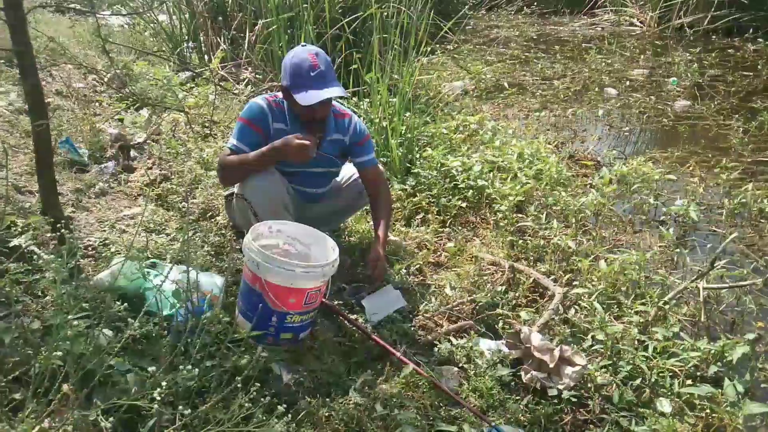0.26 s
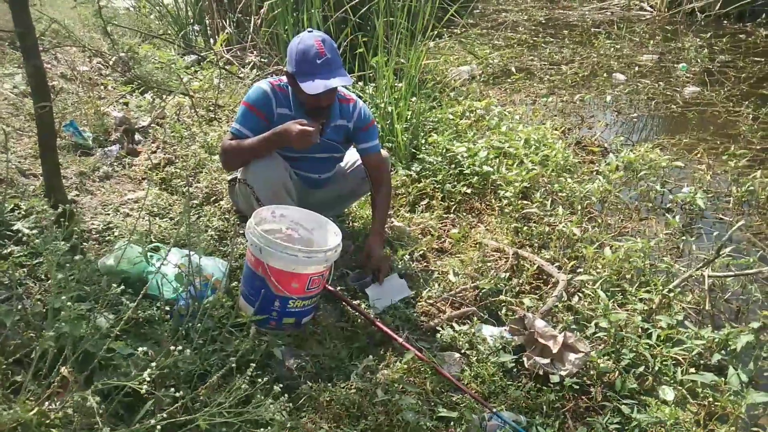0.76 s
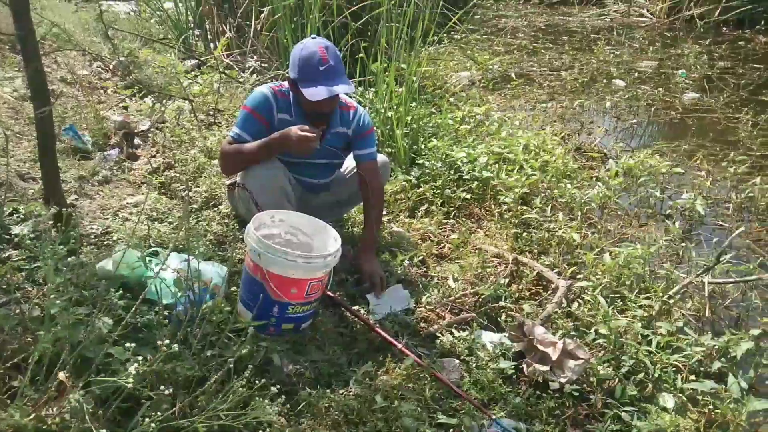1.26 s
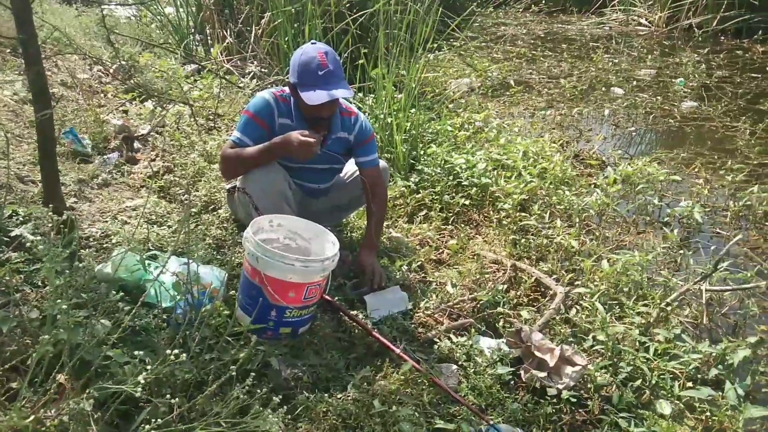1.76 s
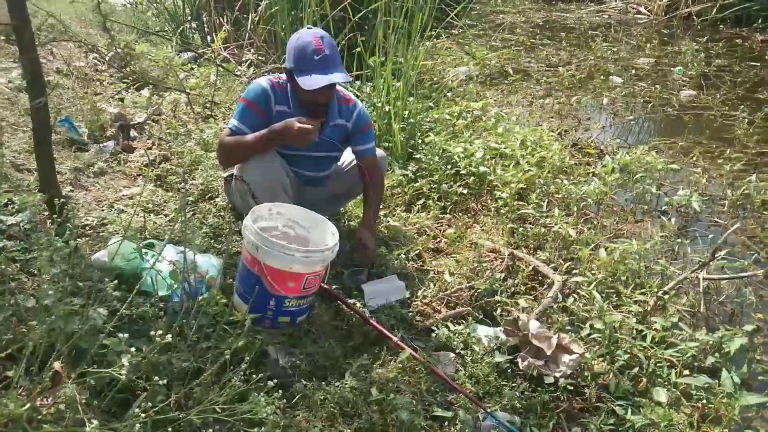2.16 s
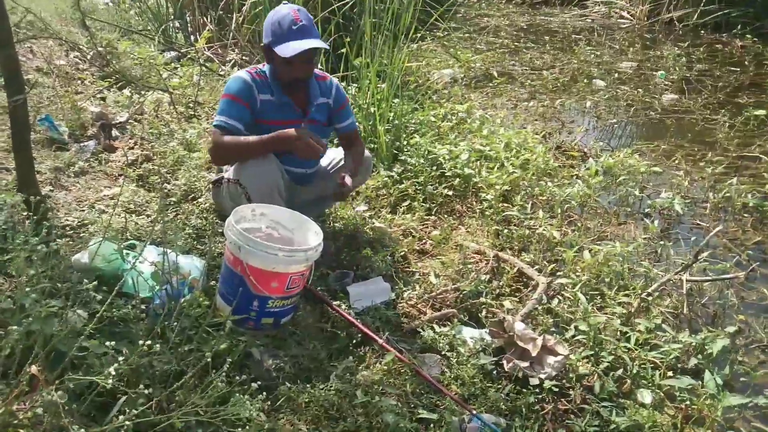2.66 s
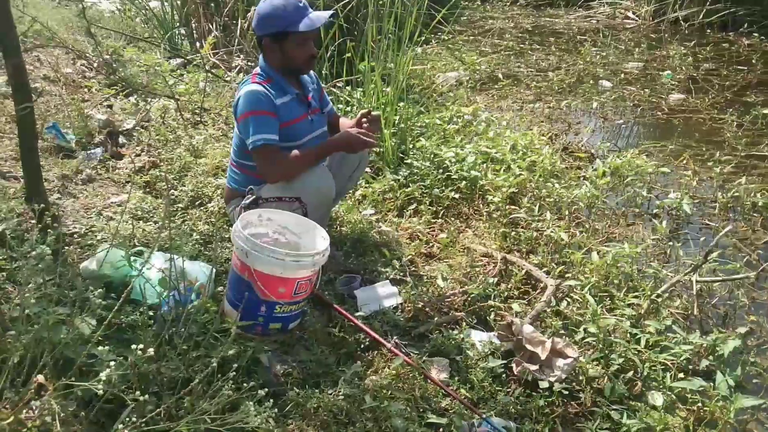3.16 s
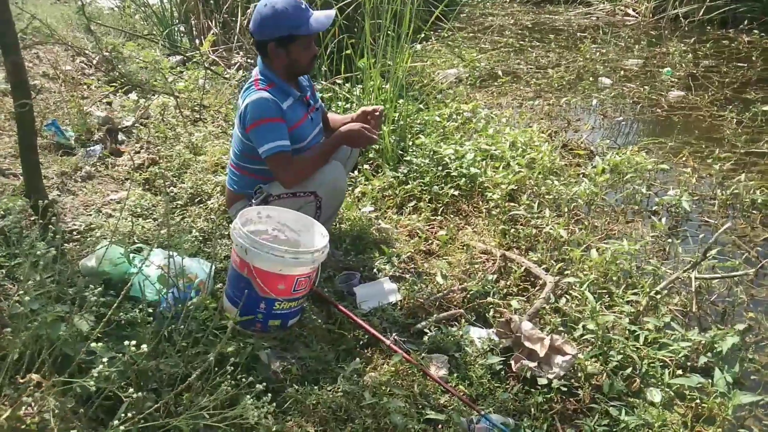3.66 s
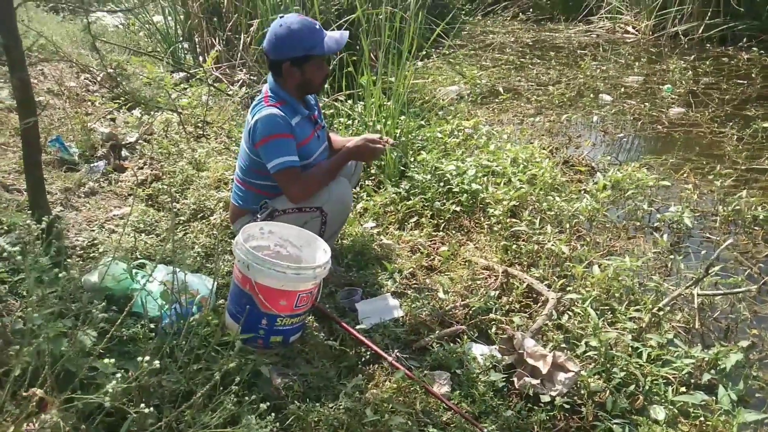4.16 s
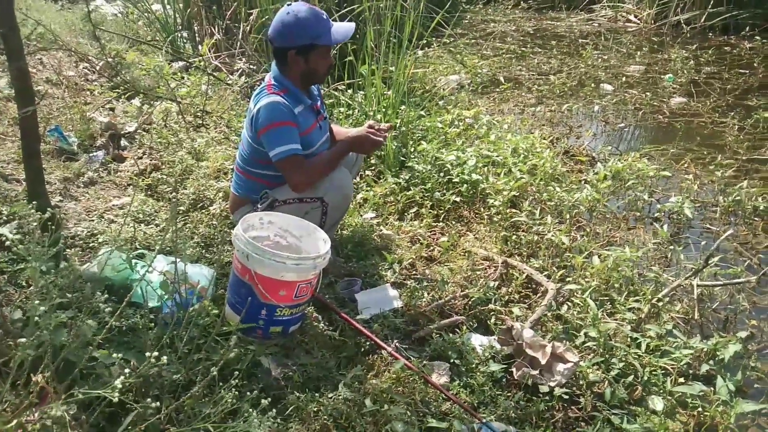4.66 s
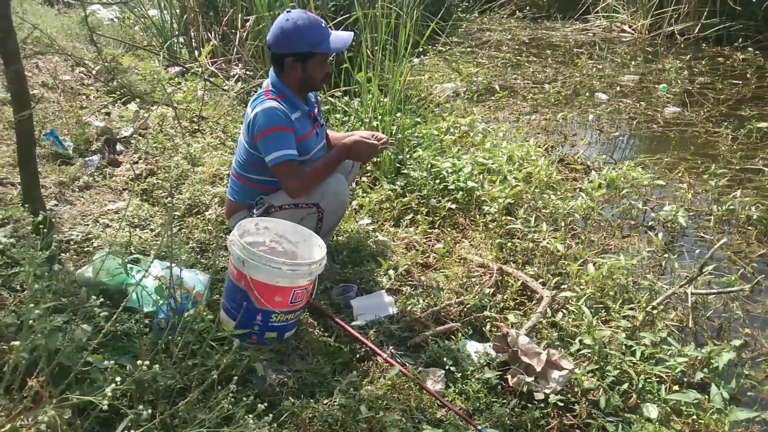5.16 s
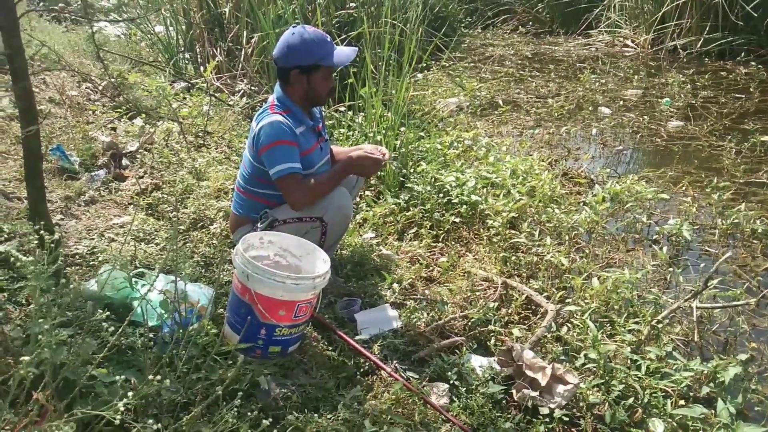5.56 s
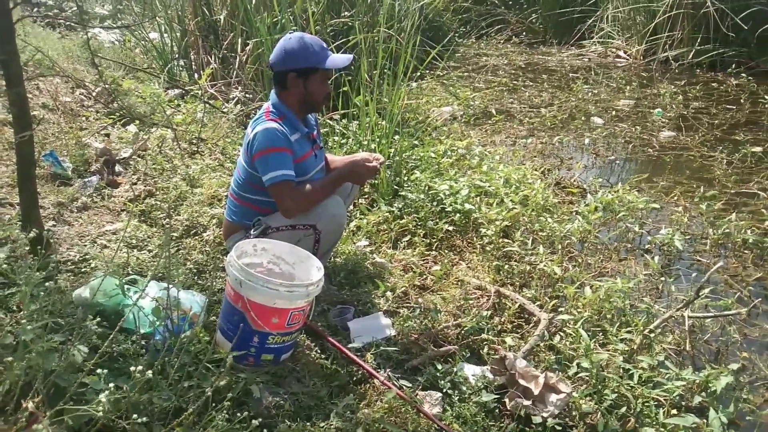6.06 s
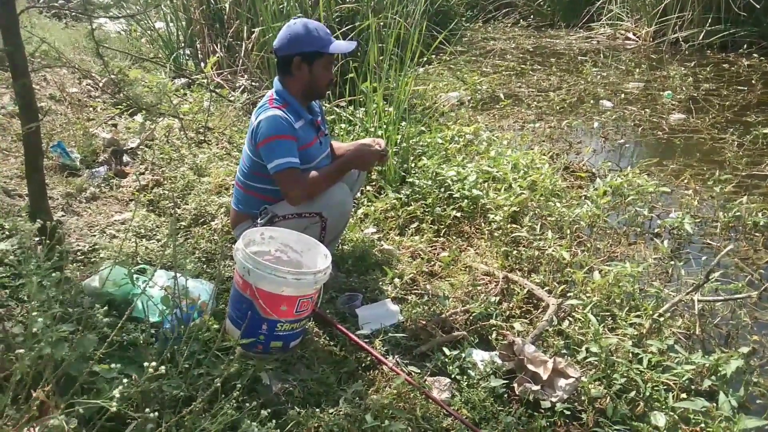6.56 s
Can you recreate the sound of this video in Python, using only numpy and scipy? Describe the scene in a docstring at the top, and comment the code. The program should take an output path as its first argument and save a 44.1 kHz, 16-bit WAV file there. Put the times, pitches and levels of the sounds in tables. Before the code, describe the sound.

Close handling ticks and hollow thuds at a quiet pond edge, a brief run of bird chips and buzzes, faint crickets chirping throughout.

```python
"""Weedy pond edge, hand on the microphone

Two crickets, sines wavering in pitch, chirp over a thin chorus of narrow-band noise. Whistles gliding in pitch
make two small birds nearby: chips that slow into a trill, then buzzes, with an echo from bank and reeds.
A hand shifts on the microphone's case: noise bursts drive its resonances as ticks, scrapes and rustle, and
pushes ring hollow thuds. Low noise rumbles on the port as wind, swelling in gusts and when the hand bumps the
case, over steady far leaves and hiss.
"""
import sys
import numpy as np
from scipy import signal
from scipy.fft import rfft, irfft
from scipy.io import wavfile
from scipy.ndimage import uniform_filter1d

SR = 44100
rng = np.random.default_rng(int(sys.argv[2]) if len(sys.argv) > 2 else 0)


def boost(x):
    """Linear amplitude factor 10**(x/20) for a level x in decibels (scalar or array-like)."""
    u = np.asarray(x, float) / 20
    return 10 ** u


def dump(signal):
    """Clip the signal to [-1, 1] and save it as 16-bit WAV at the path in sys.argv[1]."""
    limited = np.clip(np.atleast_2d(signal).T, -1, 1)
    pcm = np.round(limited * 32767).astype(np.int16)
    wavfile.write(sys.argv[1], SR, pcm)


N = 301070
T = np.arange(N) / SR

# steady rubbing of the resting hand: time_s, middle_drive_db, top_drive_db
RUB = [(0.0, -70, -95), (0.5, -70, -93.5), (0.7, -68.5, -80.5), (1.4, -64, -75), (1.7, -57, -70),
       (1.85, -68, -81.5), (3.2, -69.5, -82.5), (3.45, -89, -87.5), (4.05, -71, -85), (4.33, -65, -78),
       (4.5, -73.5, -90.5), (5.6, -72, -86.5), (6.83, -73, -83)]


def level(x, db):
    """Scale to an rms level in dB."""
    return x * boost(db) / np.sqrt(np.mean(x ** 2))


def curves(table):
    """Columns of a table after its times, drawn as lines with one value a sample."""
    s, *columns = np.transpose(table)
    return [np.interp(T, s, c) for c in columns]


def band(x, lo_hz, hi_hz, order=2):
    """Band-pass."""
    return signal.sosfilt(signal.butter(order, [lo_hz, hi_hz], "band", fs=SR, output="sos"), x)


def response(table):
    """Causal (minimum-phase) impulse response that follows (Hz, dB) points."""
    size = 16384
    hz, db = np.transpose(table)
    bins_hz = np.arange(size // 2 + 1) * SR / size
    gain = boost(np.interp(np.log(bins_hz + 1), np.log(hz), db))
    # fold the cepstrum forward so that nothing sounds ahead of its cause
    cepstrum = irfft(np.log(gain))
    cepstrum[1:size // 2] *= 2
    cepstrum[size // 2 + 1:] = 0
    return irfft(np.exp(rfft(cepstrum)))[:size // 2]


def colour(x, table):
    """Filter by (Hz, dB) points."""
    return signal.oaconvolve(x, response(table))[:N]


def walk(rate):
    """Random levels held 1 / rate s and smoothed twice; spread near 1."""
    k = int(SR / rate)
    held = np.repeat(rng.standard_normal(N // k + 1), k)
    return 1.6 * uniform_filter1d(uniform_filter1d(held, k), k)[:N]


def swells(steady_db, events):
    """Gains of a steady level plus swells that rise and fall evenly in dB round their peak."""
    power = boost(np.array(steady_db)) ** 2
    for s, *peak_db, fall_s in events:
        swell_db = np.array(peak_db)[:, None] - 10 * np.abs(T - s) / fall_s
        power = power + boost(swell_db) ** 2
    return np.sqrt(power)


def beat(table):
    """Place within each repeat (-.5 to .5, 0 in its middle) and repeats per second."""
    turns, = curves(table)
    return (turns + .5) % 1 - .5, np.gradient(turns) * SR


def wing(hz, waver_hz):
    """A ringing wing: a sine whose pitch wavers quickly."""
    return np.sin(2 * np.pi * np.cumsum(hz + waver_hz * walk(90)) / SR)


def crickets():
    """Five wing strokes a chirp up high; pairs of longer notes below; a blur of far ones as narrow noise."""
    # tempo of the high cricket, drifting a little: time_s, chirps_so_far
    high_chirps = [(-.29, 0), (.516, 8), (2.099, 24), (2.514, 28), (4.089, 44), (5.312, 56), (6.89, 72)]
    # tempo of the low cricket: time_s, note_pairs_so_far (a whole count is the middle of a pair)
    low_pairs = [(-.24, 0), (.478, 4), (1.227, 8), (1.632, 10), (3.1, 18), (5.774, 32), (6.135, 34),
                 (7.13, 40)]
    # how strongly each is heard: time_s, high_gain_db, low_gain_db, chorus_gain_db
    insects = [(0.0, -84, -72, -81), (0.61, -83.5, -77, -71), (1.63, -79, -68.5, -62.5),
               (2.15, -74.5, -79, -71), (2.53, -73.5, -70.5, -70), (2.91, -78.5, -76, -66.5),
               (3.36, -79, -77, -69), (3.84, -76.5, -73, -70), (5.15, -77, -67.5, -66.5),
               (5.89, -72, -68.5, -60.5), (6.29, -72.5, -72, -62), (6.83, -78.5, -64, -64.5)]
    high_db, low_db, chorus_db = curves(insects)

    place, rate = beat(high_chirps)
    stroke = place / rate * 120 + 2.0  # 120 strokes a second
    strokes = (.2 + .8 * np.sin(np.pi * stroke) ** 2) * (stroke > 0) * (stroke < 5)
    high = strokes * boost(2.133 * walk(60)) * wing(7530 + 18 * stroke, 40.124)

    place, rate = beat(low_pairs)
    from_note_s = np.abs(place / rate) - .023  # the notes stand 23 ms either side of the middle
    notes = np.exp(-(from_note_s / 0.018406) ** 2)
    low = notes * boost(3 * walk(25)) * wing(6970, 28)

    chorus = boost(1.747 * walk(8.3)) * band(rng.standard_normal(N), 6769.5, 7102.2)
    near = level(high, 4.401) * boost(high_db) + level(low, 0.7854) * boost(low_db)
    return near + level(chorus, -3) * boost(chorus_db)


def wind():
    """Low eddies of coloured noise on the port; a higher buffet swells in gusts and when the hand bumps the case."""
    # steady wind on the port: time_s, level_db
    steady_wind = [(0.0, -47), (0.36, -45), (0.46, -61), (1.2, -58.5), (1.9, -61.5), (2.15, -64.5),
                   (2.55, -58.5), (3.5, -67.5), (4.0, -68.5), (5.2, -66.5), (5.9, -59), (6.05, -64),
                   (6.37, -59.5), (6.73, -66.5), (6.83, -63.5)]
    # gusts, and bumps of the hand on the case: peak_s, eddies_db, buffet_db, time to fall by 10 dB fall_s
    gusts_and_bumps = [(0.0, -33.5, -52.5, 0.0448), (0.11, -37.5, -60, 0.0625), (0.23, -29, -44, 0.0231),
                       (0.33, -43, -53, 0.0433), (0.57, -43, -55.5, 0.0335), (0.81, -34.5, -57, 0.0405),
                       (1.28, -65.5, -55, 0.0752), (1.37, -47, -61.5, 0.0249), (1.98, -53.5, -57, 0.047),
                       (2.17, -57.5, -61, 0.0829), (4.1, -56.5, -56, 0.03), (4.2, -63, -62.5, 0.0439),
                       (4.47, -62, -66.5, 0.1209), (5.0, -50, -56, 0.0239), (5.05, -54, -76, 0.0248),
                       (5.4, -62.5, -59, 0.0138)]
    # spectrum of the eddies: frequency_hz, density_db (per Hz)
    eddy_colour = [(12, -58.5), (20, -39), (32, -5), (63, -2), (81, 0.5), (98, 0), (134, -8), (160, -12.5),
                   (210, -35.5), (350, -120)]
    buffet_db = -10.5  # against the steady wind
    wind_db, = curves(steady_wind)
    low, high = swells([wind_db, wind_db + buffet_db], gusts_and_bumps)
    eddies = level(colour(rng.standard_normal(N), eddy_colour), 0) * boost(1.8 * walk(25))
    buffet = level(band(rng.standard_normal(N), 119.89, 295.84), 0) * boost(2.0 * walk(30))
    return low * eddies + high * buffet


def case(table, low, middle, top):
    """Three drives into the low, middle and bright parts of the case's response, with its resonances."""
    # resonances of the case: frequency_hz, width_hz, gain_db
    case_modes = [(958.68, 54.53, 2.5), (1705.9, 70.8, -5.5), (2110.2, 71.13, -5), (2543.4, 172.7, 0.5),
                  (2956.6, 187.3, -5), (3671.3, 45, -12.5), (6348.3, 600, -13.5)]
    unit = response(table)[:SR // 20]
    rings = sum(boost(db) * signal.lfilter(*signal.iirpeak(hz, hz / width, SR), unit)
                for hz, width, db in case_modes)
    unit = unit + rings
    parts = [band(unit, lo, hi, order=3) for lo, hi in ((330, 1500), (1500, 4300), (4300, 17000))]
    # the top part is scaled by its 8-15 kHz strength alone
    sizes = parts[:2] + [band(unit, 8000, 15000, order=3)]
    drives = low, middle, top
    return sum(signal.oaconvolve(x, h / np.linalg.norm(size))[:N] for x, h, size in zip(drives, parts, sizes))


def rustle():
    """Dense tiny slips of very uneven size, in flurries; the treble crackles more unevenly still."""
    # rub strokes: peak_s, middle_drive_db, top_drive_db, time to fall by 10 dB fall_s
    rub_strokes = [(0.12, -56, -82, 0.0597), (0.31, -60.5, -85.5, 0.0013), (0.86, -59, -75.5, 0.2227),
                   (1.25, -53, -67.5, 0.1146), (1.519, -46, -65, 0.0567), (1.77, -46.5, -61, 0.033),
                   (1.86, -59.5, -70.5, 0.055), (1.981, -46.5, -60, 0.0256), (2.18, -64.5, -69.5, 0.06),
                   (2.23, -50, -85, 0.0276), (2.45, -52.5, -72, 0.0374), (2.65, -53, -75, 0.0422),
                   (3.07, -59.5, -78.5, 0.1057), (4.44, -50.5, -64, 0.0242), (5.05, -68.5, -92, 0.0249),
                   (5.7, -65, -68.5, 0.0251), (5.77, -58.5, -65.5, 0.0539), (5.84, -58.5, -69, 0.0752),
                   (5.99, -59, -79, 0.0461), (6.19, -59.5, -72, 0.0417), (6.59, -63, -70.5, 0.0182),
                   (6.72, -69, -71.5, 0.0281)]
    # spectrum of the rubbed case: frequency_hz, density_db (per Hz)
    rubbed = [(240, -38), (400, -16.5), (579, -10), (666, -4.5), (935, -7.5), (1490, -7), (2840, 4),
              (4380, -7), (7170, -0.5), (10500, -27.5), (14800, -19), (16000, -16.5)]
    middle, top = swells(curves(RUB), rub_strokes)
    size_db = np.minimum(5.5 * rng.exponential(size=N), 27)
    slips = level(rng.standard_normal(N) * boost(size_db + 2.7976 * walk(70)), 0)
    crackle = level(slips * boost(3.3 * walk(220)), 0)
    return case(rubbed, slips * middle * boost(-9), slips * middle, crackle * top)


def air():
    """Far leaves and the microphone's own hiss, as one steady coloured noise."""
    # spectrum of the background: frequency_hz, density_db (per Hz, relative)
    air_colour = [(71, -27), (120, -3), (410, -11.5), (1050, -12), (1320, -15), (1980, -16.5), (2700, -10),
                  (4590, -18), (5750, -16.5), (6770, -9), (7660, -20.5), (8660, -31), (11800, -38.5),
                  (15000, -32.5), (16000, -43.5)]
    return level(colour(rng.standard_normal(N), air_colour), -63)


def strays():
    """Faint touches at chance moments, louder while the resting hand rubs harder."""
    per_s, above_rub_db, scatter_db, length_ms = 9, 7.5, 3.5, 5.51
    low_db, top_db = -8, -13  # against the middle
    count = int(per_s * N / SR)
    s = rng.uniform(0, T[-1] - .07, count)
    chance = rng.standard_normal((count, 3))
    db = np.interp(s, *np.transpose(RUB)[:2]) + above_rub_db
    db = db[:, None] + [0, low_db, top_db] + scatter_db * chance
    return np.column_stack([s, db, np.full(count, length_ms)]).tolist()


def touches():
    """Each touch is a burst of slip noise into the case; firm pushes ring the hollow body."""
    # ticks and scrapes on the case: start_s, middle_drive_db, low_drive_db, top_drive_db, nominal length_ms
    case_touches = [(0.0712, -50, -49.5, -71.5, 5.205), (0.0969, -47, -49.5, -73.5, 4.698),
                    (0.2422, -42.5, -54.5, -63.5, 5.524), (0.6387, -48, -52, -73.5, 3.485),
                    (0.6803, -49, -59, -64, 1.963), (0.8856, -44.5, -44.5, -64, 4),
                    (1.1689, -43.5, -66, -82.5, 2.139), (1.2046, -48.5, -65.5, -68.5, 9.01),
                    (1.282, -39.5, -34, -78, 6.785), (1.3079, -43, -58, -79, 3.25),
                    (1.3583, -51, -63, -71.5, 13.3), (1.4466, -55, -47.5, -74.5, 2.301),
                    (1.4875, -49, -59, -62, 14.23), (1.523, -41.5, -50, -45, 5.418),
                    (1.591, -51.5, -51.5, -80.5, 6.56), (1.6185, -40, -43, -51, 3.665),
                    (1.6582, -47, -57, -59.5, 17.37), (1.6956, -45, -46.5, -65.5, 5.36),
                    (1.731, -44.5, -73, -62.5, 5.226), (1.746, -41, -71, -51.5, 5.263),
                    (1.8491, -51, -58.5, -64, 7.02), (1.9648, -33.5, -34.5, -60.5, 6.666),
                    (1.9811, -29, -37.5, -38.5, 4.055), (2.1636, -41.5, -51, -59.5, 5.277),
                    (2.1721, -26.5, -42.5, -43, 8.731), (2.1875, -39.5, -46.5, -45, 0.579),
                    (2.2087, -43, -69.5, -51.5, 3.694), (2.2227, -33.5, -36, -51, 9.791),
                    (2.3158, -49.5, -62, -59, 4.103), (2.356, -38, -48.5, -49, 3.269),
                    (2.4203, -44.5, -47, -51.5, 1.7855), (2.4267, -23, -32, -61.5, 3.2625),
                    (2.4362, -33, -43.5, -53.5, 4.021), (2.487, -32.5, -48, -46, 8.342),
                    (2.545, -45.5, -48, -70.5, 2.827), (2.591, -51, -56, -65, 3.262),
                    (2.7101, -42, -53, -79, 4.799), (2.8881, -52.5, -55, -58, 1.027),
                    (2.9047, -41, -53.5, -47.5, 1.763), (2.9881, -42, -32.5, -57, 0.8982),
                    (3.05, -46, -57.5, -66.5, 7.77), (4.0053, -47.5, -56, -74.5, 3.036),
                    (4.1, -63.5, -57, -82.5, 6.8), (4.2323, -55, -77, -74, 3.63),
                    (4.2963, -54.5, -79, -71, 9.79), (4.355, -55.5, -48, -82.5, 3.36),
                    (4.374, -40.5, -46, -61, 6.84), (4.4239, -47.5, -70.5, -59.5, 8.18),
                    (4.985, -66, -57, -79.5, 12.6), (5.0416, -60.5, -53, -72, 6.634),
                    (5.67, -61, -71.5, -60.5, 2.638), (5.9577, -47.5, -73.5, -67.5, 11.42),
                    (6.0413, -49.5, -69.5, -73, 7.574), (6.1873, -48.5, -70, -80, 3.254),
                    (6.7312, -60.5, -70, -47, 0.863)]
    # pushes that ring the hollow body: start_s, push_db
    thuds = [(0.1472, -55), (0.2422, -35.5), (0.8861, -45.5), (1.0235, -47.5), (1.064, -50.5),
             (1.2048, -53), (1.282, -28), (1.591, -48.5), (1.6955, -48), (1.757, -33), (1.8495, -53),
             (1.9646, -47), (1.9815, -35), (2.1723, -38.5), (2.2227, -39.5), (2.4267, -36), (2.487, -40),
             (2.6258, -48), (2.7102, -57), (4.355, -55.5), (4.374, -50), (4.4238, -50)]
    # spectrum of the touched case: frequency_hz, density_db (per Hz)
    case_colour = [(240, -25), (400, 0.5), (460, -15.5), (504, -3), (645, -4.5), (949, -6), (1250, -7.5),
                   (1510, -6.5), (1840, -4.5), (3640, -3), (4310, -24), (6150, -3), (10100, -32.5),
                   (14600, -49), (16000, -27.5)]
    # resonances of the hollow body: frequency_hz, width_hz, gain_db (before the scaling by width)
    hollow = [(270.04, 20.83, 3), (435.3, 220, -11), (201.38, 118.7, -8.5)]
    drive, push, tick = np.zeros((3, N)), np.zeros(N), np.zeros(N)
    t_ms = T[:SR // 16] * 1000
    rows = case_touches + strays()
    chance = rng.standard_normal((len(rows), len(t_ms)))
    for (s, mid_db, low_db, top_db, length_ms), noise in zip(rows, chance):
        i = int(s * SR)
        decay_ms = max(length_ms - .95, .06)
        burst = noise * (1 - np.exp(-t_ms / (0.1009 * decay_ms))) * np.exp(-t_ms / decay_ms)
        burst[0] = 0.5496  # the first snap
        burst *= np.sqrt(length_ms * SR / 2000) / np.linalg.norm(burst)
        bare = np.exp(-(length_ms / 1.7) ** 4)  # the briefest are bare ticks that ring nothing
        tick[i] += bare * boost(mid_db + 29)
        drive[:, i:i + len(t_ms)] += (1 - bare) * burst * boost(np.array([[low_db], [mid_db], [top_db]]))
    for s, push_db in thuds:
        i = int(s * SR)
        push[i:i + len(t_ms)] += boost(push_db) * (t_ms / 0.48084) * np.exp(1 - t_ms / 0.31431)
    thud = sum(boost(db) * signal.lfilter(*signal.iirpeak(hz, hz / width, SR), push) * 300 / width
               for hz, width, db in hollow)
    return case(case_colour, *drive) + thud + band(tick, 222.7, 4181)


def sing(shape, notes):
    """A whistle that follows the note shape; pulsing shakes its level up as its pitch dips."""
    out = np.zeros(N)
    ms, hz, db, pulsing = np.transpose(shape)
    t_ms = np.arange(int(ms[-1] * SR / 1000)) / SR * 1000
    rasp = uniform_filter1d(rng.standard_normal((len(notes), len(t_ms))), size=30) * 4
    for (s, note_db, pitch), rough in zip(notes, rasp):
        pulse = np.cos(2 * np.pi * 0.072858 * (t_ms - 13))  # cycles per ms
        shake = np.interp(t_ms, ms, pulsing) * (pulse + rough)
        f = pitch * np.interp(t_ms, ms, hz) - 45 * shake
        gain = boost(note_db + np.interp(t_ms, ms, db) + 0.1304 * shake)
        whistle = np.sin(2 * np.pi * np.cumsum(f) / SR)
        i = int(s * SR)
        out[i:i + len(t_ms)] += gain * signal.windows.tukey(len(t_ms), .15) * whistle
    return out


def birds():
    """Faint low rises, chips slowing into a trill, two-voiced buzzes; an echo off the bank, scatter from reeds."""
    # note shapes: time_ms, pitch_hz (before ratio and shake), level_db (against the note), pulsing depth
    rise = [(0, 880, -7.5, 0), (29.868, 1150, -1.5, 0), (49.613, 1350, 1, 0),
            (60.09, 1410, -13.5, 0.000069)]
    chip = [(0, 6900, -16, 0), (5, 6350, -5, 0), (10, 6050, 0, 0), (15, 5800, -6, 0), (21, 5400, -18, 0),
            (26, 4800, -1, 2), (28, 4200, -9, 3), (32, 2800, -12, 3), (34, 2400, -24, 0)]
    slur = [(0, 6650, -10, 0), (10, 6550, 0, 0), (16, 6300, -4, 0), (20, 5600, 0, 0), (25, 4800, -8, 0),
            (33, 3600, -14, 0), (38, 3000, -22, 0)]
    trill = [(0, 6850, -9, 1), (5, 6150, -1, 1), (14, 5600, -3, 2), (21, 5050, 0, 2), (25, 4300, -7, 3),
             (31, 2750, -12, 3), (34, 2300, -24, 0)]
    buzz = [(0, 5750, -16, 6), (8, 5500, -12, 8), (30, 5150, -12, 8), (42, 5080, -5, 3), (55, 5010, 0, 1.5),
            (71, 4900, -1, 2), (88, 4830, -13, 2)]
    buzz_under = [(0, 5200, -26, 0), (8, 4500, -13, 1), (13, 4120, -9, 3), (28, 4350, -12, 6),
                  (45, 4420, -11, 7), (62, 4450, -19, 6)]
    # notes sung: start_s, level_db, pitch_ratio
    rises = [(1.424, -63, 1.2), (6.139, -61, 1.03)]
    chips = [(2.547, -43.5, 0.98806), (2.615, -49.5, 0.8935), (2.687, -43.5, 0.99924),
             (2.763, -43, 0.98134), (2.839, -43, 0.98905)]
    slurs = [(2.592, -44, 1)]
    trills = [(2.915, -44.5, 0.97235), (2.995, -44, 0.9952), (3.079, -44, 0.98086), (3.17, -45.5, 0.99555),
              (3.263, -45.5, 0.9986)]
    buzzes = [(3.196, -44.5, 1), (3.308, -47, 1), (3.418, -45.5, 1), (3.526, -46, 0.98245),
              (3.642, -46, 0.9866), (3.756, -47.5, 0.9727)]
    # the first buzz lacks the under voice
    songs = ((chip, chips), (trill, trills), (slur, slurs), (buzz, buzzes),
             (buzz_under, buzzes[1:]), (rise, rises))
    direct = sum(sing(*song) for song in songs)

    reeds_t60_s, reeds_db, bank_ms, bank_db = 0.3455, 2, 11, -8  # levels ahead of the band-pass
    t = T[:SR // 2]
    echo = rng.standard_normal(len(t)) * np.exp(-np.log(1000) * t / reeds_t60_s) * (1 - np.exp(-t / 0.0021))
    echo *= boost(reeds_db) / np.linalg.norm(echo)
    echo[int(bank_ms * SR / 1000)] += boost(bank_db)
    return direct + signal.oaconvolve(direct, band(echo, 5496.4, 9247))[:N]


def scene():
    """All sources at one microphone."""
    return (crickets() + wind() + rustle() + air() + touches() + birds())[None]


def roll_off(x):
    """The treble ends steeply here."""
    return signal.sosfilt(signal.butter(12, 16270, fs=SR, output="sos"), x)


def record(dry):
    """The microphone drops the deepest bass and the very top."""
    dry = signal.sosfilt(signal.butter(4, 52, "high", fs=SR, output="sos"), dry)
    mix = signal.sosfilt(signal.ellip(8, .2, 50, 15500, fs=SR, output="sos"), dry)
    return roll_off(mix)


dry = scene()
out = record(dry)
dump(out)
```